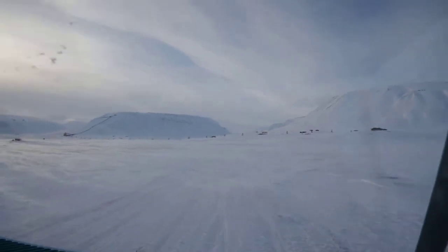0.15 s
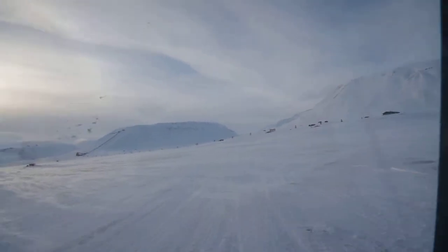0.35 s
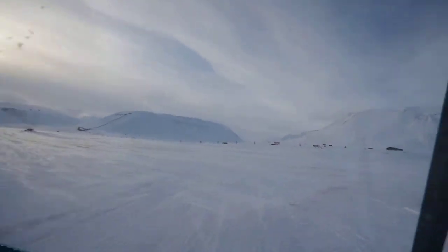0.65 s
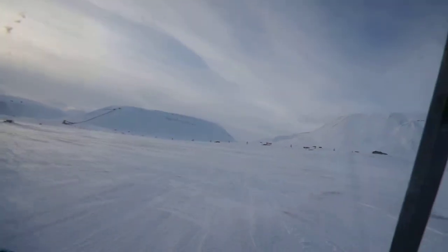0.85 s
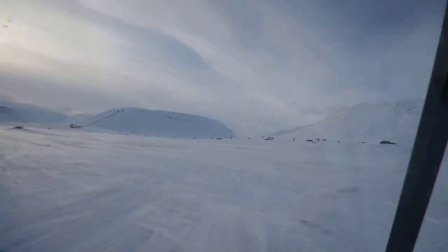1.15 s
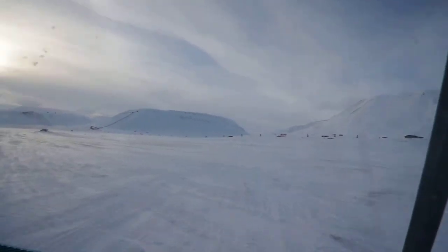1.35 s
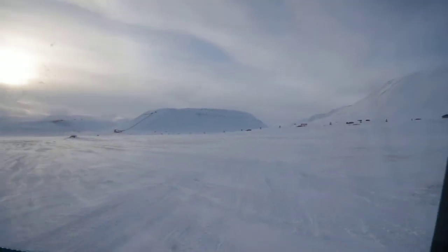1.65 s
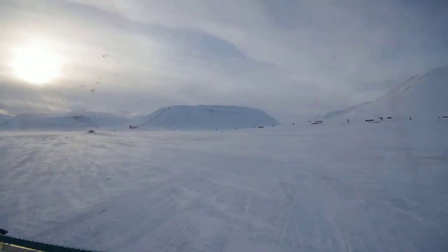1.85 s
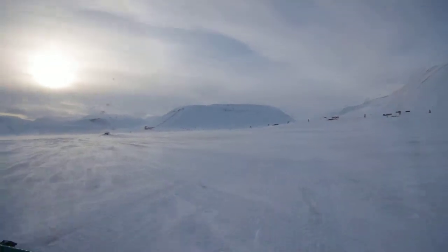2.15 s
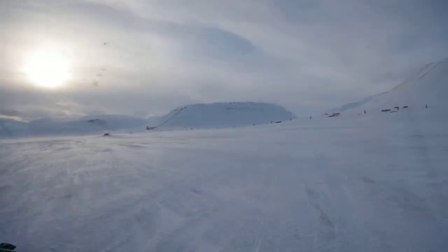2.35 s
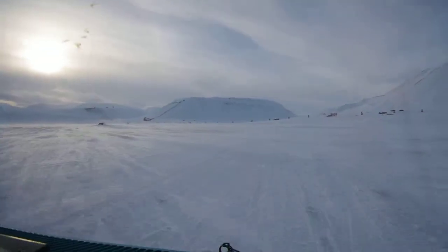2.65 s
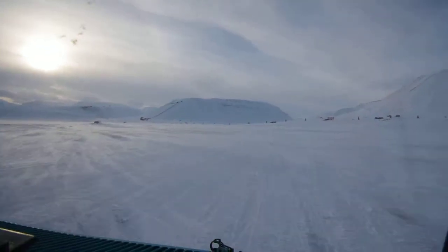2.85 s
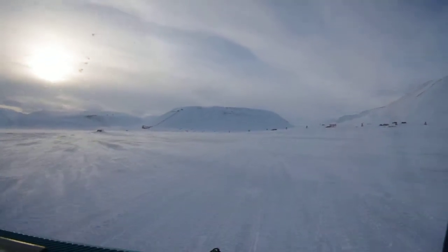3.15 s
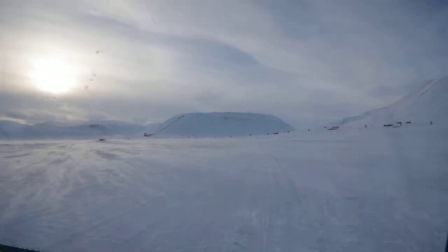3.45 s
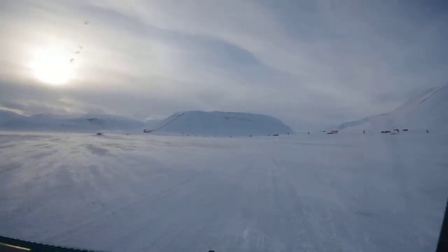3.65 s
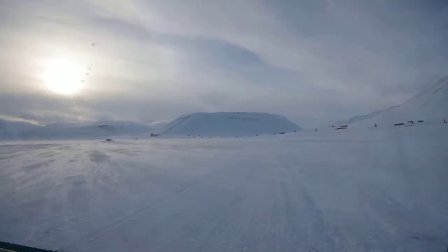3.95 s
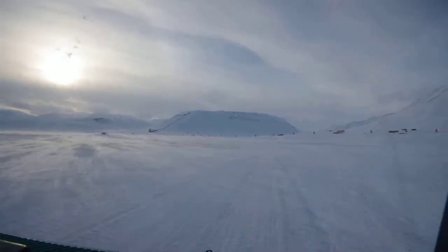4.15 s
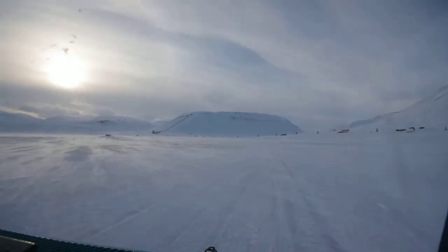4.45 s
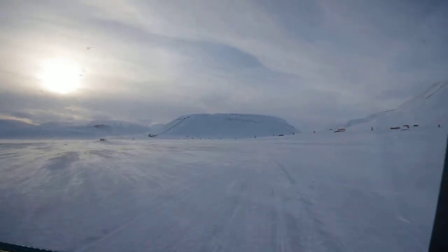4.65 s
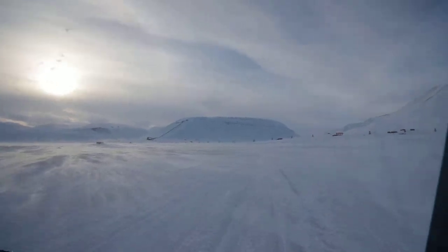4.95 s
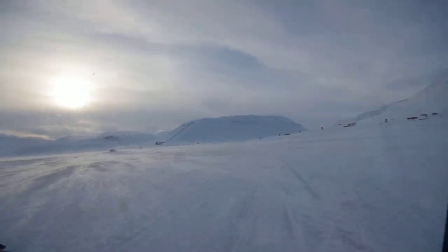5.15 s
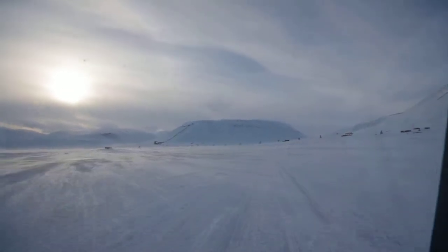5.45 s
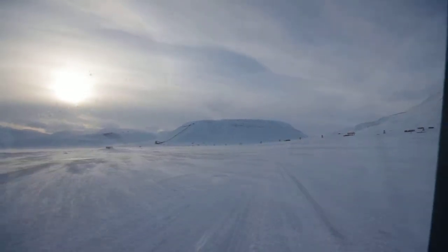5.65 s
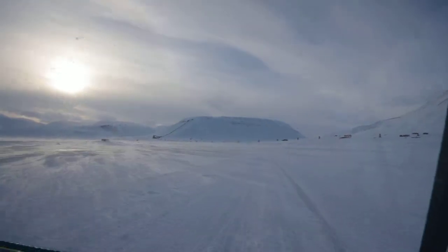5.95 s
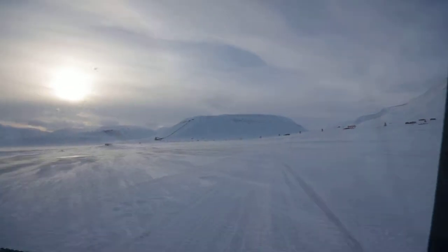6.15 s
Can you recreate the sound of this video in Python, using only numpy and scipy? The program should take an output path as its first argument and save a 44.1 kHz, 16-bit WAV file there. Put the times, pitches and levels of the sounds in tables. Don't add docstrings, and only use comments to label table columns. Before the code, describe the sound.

A booming engine drone dominates a cramped snow vehicle cab. Under it are track rumble, a muffled roar and a faint panel buzz. Hard bumps come early and again soon after, then a brief track slip at the middle. High metallic jingling flares, strongest in the later part, followed by more gear whine. The microphone overloads on deep jolts, giving irregular clicks and small level jumps all along.

```python
import sys
import numpy as np
from scipy import signal
from scipy.fft import rfft, irfft
from scipy.io import wavfile
from scipy.ndimage import uniform_filter1d

SR = 44100
rng = np.random.default_rng(int(sys.argv[2]) if len(sys.argv) > 2 else 0)


def transcribe(signal):
    frames = np.atleast_2d(signal).T
    limited = np.clip(frames, -1, 1)
    pcm = np.round(limited * 32767).astype(np.int16)
    wavfile.write(sys.argv[1], SR, pcm)


def gain_from_db(level_db):
    decades = np.asarray(level_db, float) / 20
    return 10 ** decades


N = 277406


def evened(x):
    return x / np.sqrt(np.mean(x ** 2) + 1e-20)


def curve(rows, column=1):
    columns = np.transpose(rows)
    return np.interp(np.arange(N) / SR, columns[0], columns[column])


def swells(rows, rest_db):
    centre_s, half_s, peak_db = np.transpose(rows)[:, :, None]
    t = np.arange(0, N + 64, 64) / SR
    each_db = peak_db - 12 * abs((t - centre_s) / half_s) ** 1.3
    return np.interp(np.arange(N) / SR, t, np.maximum(each_db.max(0), rest_db))


def wander(rate_hz):
    steps = rng.standard_normal(N // 64 + 2)
    smooth = signal.sosfiltfilt(signal.butter(2, rate_hz, fs=SR / 64, output="sos"), steps)
    return evened(np.interp(np.arange(N), np.arange(len(steps)) * 64, smooth))


def resonate(x, hz, width_hz):
    turn = np.exp(2j * np.pi * hz * np.arange(N) / SR)
    r = np.exp(-np.pi * width_hz / SR)
    return 2 * (turn * signal.lfilter([1 - r], [1, -r], x / turn)).real


def resonant_noise(hz, width_hz):
    once = resonate(rng.standard_normal(N), hz, width_hz)
    return evened(resonate(once, hz, width_hz))


# f/Hz, density/dB
ROAR_SPECTRUM = [(13, -46), (22, -30), (103, -5.5), (189, -5), (229, -4), (263, -8), (286, -4.5),
                 (328, -10), (366, -12.5), (569, -12.5), (792, -20), (5030, -44.5), (6270, -50.5),
                 (14700, -69), (16000, -37)]


def roar():
    frames, hz = N // 128 + 5, np.fft.rfftfreq(512, 1 / SR)
    real, imag, patches = rng.standard_normal((frames, 257, 3)).T
    patches = evened(uniform_filter1d(uniform_filter1d(patches, 10, 0), 12, 1))
    flicker = evened(uniform_filter1d(rng.standard_normal(frames), 3))
    flicker = flicker * np.clip(hz / 3000, 0, 1)[:, None]
    spectra = (real + 1j * imag) * gain_from_db(0.39 * patches + 2.2 * flicker)
    shaken = signal.istft(spectra, nperseg=512, noverlap=384)[1][:N]
    f, db = np.transpose(ROAR_SPECTRUM)
    log_hz = np.log(np.fft.rfftfreq(N, 1 / SR) + 1)
    colour = gain_from_db(np.interp(log_hz, np.log(f + 1), db))
    return gain_from_db(-36.5) * evened(irfft(rfft(shaken) * colour, N))


# f/Hz, width/Hz, level/dB
PANEL = (568, 24, -52)


def panel_buzz():
    hz, width_hz, db = PANEL
    return gain_from_db(db) * resonant_noise(hz, width_hz)


# t/s, level/dB, f/Hz
TICKS = [(0.1884, -35, 8900), (.969, -42.5, 8500), (1.2216, -37.5, 8350), (2.9233, -34.5, 8330),
         (3.8855, -32, 9250), (3.8888, -40, 7800), (3.975, -40, 7900), (4.3261, -40, 8950),
         (4.452, -44, 7800), (4.7486, -35, 8700), (4.845, -47, 8100), (4.7575, -58, 7600),
         (5.1935, -41, 8100), (6.1458, -35, 8200)]


def ticks():
    t, out = np.arange(300) / SR, np.zeros(N + 300)
    low = (t / .00022) * np.exp(1 - t / .00022) + .03 * np.exp(-t / .0015)
    high = .6 * (t / .0003) * np.exp(1 - t / .0003) + .02 * np.exp(-t / .0015)
    for s, db, hz in TICKS:
        tap = low * np.sin(2 * np.pi * hz * t) + high * np.sin(2.44 * np.pi * hz * t)
        at = round(s * SR)
        out[at:at + 300] += gain_from_db(db) * tap
    return out[:N]


# f/Hz, level/dB, ring length/s (60 dB down after 0.42 of it)
PARTS = [(6500, -11, .04), (8720, -9, .05), (10300, -8, .08), (11500, -10, .06), (12600, -6, .1),
         (13300, -7, .08), (14200, -6, .08), (14600, -8, .06), (15270, -1, .1), (15640, -4, .08)]
# centre t/s, half length/s, level/dB
SHAKES = [(.09, 0.11, -56), (.34, 0.046, -54), (.51, 0.051, -52), (.75, 0.29, -53.5), (1.62, 0.095, -49),
          (1.79, 0.098, -46.5), (1.89, 0.021, -48), (1.98, 0.046, -46), (2.015, 0.037, -49),
          (2.16, .06, -56), (2.45, 0.11, -56), (3.27, 0.24, -58), (3.46, .08, -47.5), (3.71, 0.07, -48),
          (4.13, .08, -52), (4.38, 0.068, -45.5), (4.62, 0.039, -37.5), (4.92, 0.0083, -63),
          (5.01, .025, -46), (5.46, 0.074, -50), (5.54, 0.052, -48.5), (6.2, 0.93, -56.5)]


def jingle():
    t, rings = np.arange(6000) / SR, np.zeros(N)
    knocks_per_s, threshold_db = 90, -64
    shake = gain_from_db(swells(SHAKES, rest_db=-61.5) + 3.4 * wander(51.0))
    clash = np.maximum(shake - gain_from_db(threshold_db), 0)
    for hz, db, ring_s in PARTS:
        strength = gain_from_db(3.5 * np.minimum(rng.exponential(1, N), 4))
        knocks = strength * (rng.random(N) < knocks_per_s / SR)
        ring = gain_from_db(db - 60 * t / (0.42 * ring_s)) * np.sin(2 * np.pi * hz * t)
        rings += signal.oaconvolve(evened(knocks) * clash, ring)[:N]
    rustle = signal.sosfilt(signal.butter(2, 7000, "high", fs=SR, output="sos"), rng.standard_normal(N))
    rustle += 0.51 * signal.sosfiltfilt(signal.butter(2, 13500, "high", fs=SR, output="sos"), rustle)
    return gain_from_db(-37.5) * rings + (gain_from_db(-7.5) * shake + gain_from_db(-71.5)) * rustle


# t/s, f/Hz
HUM = [(0.0, 272.9), (0.07, 278.8), (0.59, 276.4), (1.12, 279.7), (1.3, 277.4), (1.45, 281.1),
       (2.03, 280.7), (2.5, 286.2), (2.8, 286.3), (2.94, 290.2), (3.5, 288.0), (3.94, 284.6), (4.35, 285.0),
       (5.54, 279.1), (5.88, 279.4), (6.29, 277.2)]


def hum_turns():
    return np.cumsum(curve(HUM)) / SR


# f/Hz, width/Hz, level/dB
TRACK = [(106, 13, -3), (128, 25, -7), (75, 30, -9)]
# centre t/s, half length/s, loss/dB
SLIPS = [
    (.85, .4, 3),
    (1.18, 0.089, 14),
    (2.5, 0.55, 9),
    (2.98, .06, 20),
    (5.04, 0.056, 5),
    (5.19, 0.053, 3),
    (5.45, .07, 11),
]
# centre t/s, half length/s, level/dB
BUMPS = [(.12, 0.14, -34), (.39, 0.3, -37), (.65, .3, -45), (1.2, 0.081, -27), (1.75, 0.24, -32.5),
         (2.05, 0.46, -35.5), (2.26, .07, -27), (2.44, 0.099, -31), (2.95, 0.22, -46), (3.52, 0.23, -33.5),
         (3.75, 0.1, -35), (4.08, 0.21, -37), (4.43, 0.12, -32), (4.79, 0.058, -29), (5.03, .05, -35),
         (5.5, 0.99, -40), (5.88, 0.07, -38), (6.2, 0.27, -45)]


def tracks():
    fuzz = sum(gain_from_db(db) * resonant_noise(hz, width_hz) for hz, width_hz, db in TRACK)
    throb_db = -44.5 - swells(SLIPS, rest_db=0)
    sprocket_per_hum = .192
    throb = np.sqrt(2) * gain_from_db(throb_db) * np.sin(2 * np.pi * sprocket_per_hum * hum_turns())
    lumps_db = .65 * swells(BUMPS, rest_db=-44) - 14.5
    eased_db = -.8 * uniform_filter1d(gain_db(), size=SR // 8)
    return gain_from_db(eased_db) * (throb + gain_from_db(lumps_db) * evened(fuzz))


# t/s, pitch factor/1, level/dB
WHINE = [
    (0, .995, -62),
    (2, 1.0, -60),
    (3, 1.02, -59),
    (4.3, 1.01, -60),
    (4.8, 1.003, -56),
    (6.29, .993, -56),
]
GEAR_HZ = [866, 1122, 752]


def gear_whine():
    out = np.zeros(N)
    for hz, db in zip(GEAR_HZ, (1, -1, -2)):
        phase = 2 * np.pi * np.cumsum(hz * curve(WHINE)) / SR + .3 * wander(9.0)
        out += gain_from_db(curve(WHINE, column=2) + db + 1.76 * wander(17.0)) * np.sin(phase)
    return out


# multiple of firing rate/1, level/dB
ORDER_DB = [(1, -49.5), (2, -41), (3, -30.5), (6, -54.5), (8, -74)]


def engine():
    firings = hum_turns() / 3
    out = np.zeros(N)
    for k, db in ORDER_DB:
        phase = 2 * np.pi * k * firings + 0.004 * k * wander(21.0)
        out += np.sqrt(2) * gain_from_db(db + 1.2 * wander(6.7)) * np.sin(phase)
    return out


def scene():
    return (roar() + panel_buzz() + ticks() + jingle() + tracks() + gear_whine() + engine())[None]


def on_hum(rows, lead):
    rows, turns, t = np.array(rows, float), hum_turns(), np.arange(N) / SR
    place = .5 * (rows[:, 1] < 0) - lead
    cycle = np.round(np.interp(rows[:, 0], t, turns) - place)
    return np.c_[np.interp(cycle + place, turns, t), rows[:, 1:]]


def stairs(times_s, signs):
    at, out = np.asarray(times_s) * SR, np.zeros(N + 2)
    np.add.at(out, at.astype(int), signs * (1 - at % 1))
    np.add.at(out, at.astype(int) + 1, signs * (at % 1))
    return out[:N]


CLIMB_S, CLIMB_SHARE = .0065, .8
NIP_LUCK = rng.random((800, 3))
# start t/s, length/s
LULLS = [(.28, .095), (.58, .085), (.88, .08), (1.14, .05), (1.38, .07), (1.7, .085), (2.0, .07),
         (2.11, .065), (2.33, .1), (2.51, .135), (2.875, .13), (3.06, .09), (3.19, .06), (3.57, .085),
         (3.715, .05), (3.99, .04), (4.21, .075), (4.705, .05), (4.87, .045), (5.03, .04), (5.11, .09),
         (5.76, .13), (6.01, .05)]


def nips():
    soonest_s, mean_further_s, stairs_allowed, most_cut = .004, .007, 5, 3
    gap, weak, sign = NIP_LUCK.T
    s = np.cumsum(soonest_s - mean_further_s * np.log(gap))
    start, length = np.transpose(LULLS)[:, :, None]
    in_lull = ((s > start) & (s < start + length)).any(0)
    live = ~in_lull & (s < N / SR - .01)
    small = [(t, 0, stairs_allowed * w, 2 * g - 1) for t, w, g in zip(s[live], weak[live], sign[live])]
    deep = [(row[0], abs(row[1]) + sum(row[2:]), 0, 0) for row in CUTS + SLAMS]
    rows, height, last_s = [], 0, 0
    for t, cut, allowed, side in sorted(small + deep):
        now = height + CLIMB_SHARE * ((t - last_s) // CLIMB_S)
        if not cut:
            excess = now - allowed
            cut = min(np.ceil(excess), np.ceil(most_cut * side ** 2) + excess // stairs_allowed)
        if cut > 0:
            height, last_s = now - cut, t
            if side:
                rows.append((t, np.sign(side) * cut))
    return np.array(rows)


# t/s, stairs/1 signed as the click
CUTS = [(0.0657, 5), (0.2054, -4), (0.2757, 4), (0.3963, -6), (0.8237, 5), (0.8606, 4), (1.072, 4),
        (1.2745, -5), (1.6956, 6), (1.7903, 4), (1.9509, -4), (2.3644, 4), (2.4514, 5), (2.694, -4),
        (3.0089, 5), (3.0409, -6), (3.2843, 5), (3.5285, -5), (3.6805, 4), (3.7095, -5), (4.0456, -5),
        (4.1329, -7), (4.5678, 4), (4.7007, 4), (4.771, 6), (4.9394, 5), (5.0731, 5), (5.5672, -4),
        (5.6788, -5), (5.7232, 5)]
# t/s, quick signed stairs/1, slower stairs after/1
SLAMS = [(0.3787, -5, 2), (0.5754, 5, 3), (0.6706, 6, 0), (0.7308, 5, 0), (1.1079, 4, 1), (1.1929, 5, 2),
         (1.4511, 9, 2), (1.5451, 5, 0), (1.639, 2, 4), (1.9873, -5, 0), (2.071, 4, 1), (2.1766, 6, 2),
         (2.2697, 5, 0), (2.4321, -7, 1), (2.6466, 7, 4), (2.87, 6, 1), (3.445, 4, 1), (3.4826, 5, 0),
         (3.5663, -5, 3), (3.8603, -5, 0), (4.2076, -4, 1), (4.3367, -4, 3), (4.481, -5, 0),
         (4.7592, -2, 3), (5.023, -5, 1), (5.204, -5, 1), (5.2874, 6, 0), (5.4017, 4, 1), (5.8945, 4, 4),
         (6.1041, 5, 0)]


def cut_trains():
    quick_s, stair_s = .0001, .0004
    cuts, slams = on_hum(np.r_[CUTS, nips()], lead=0), on_hum(SLAMS, lead=.11)
    slow, quick = [], []
    for s, n in cuts:
        slow += [(s + k * stair_s, np.sign(n)) for k in range(abs(int(n)))]
    for s, n, after in slams:
        quick += [(s + k * quick_s, np.sign(n)) for k in range(abs(int(n)))]
        end_s = s + (abs(n) - 1) * quick_s
        slow += [(end_s + (k + 1) * stair_s, np.sign(n)) for k in range(int(after))]
    return stairs(*np.transpose(slow)), stairs(*np.transpose(quick))


def climb_train(cuts):
    n = np.arange(N)
    since = (n - np.maximum.accumulate(n * (cuts > 0))) / (CLIMB_S * SR)
    return np.maximum(np.diff(np.floor(since), prepend=0), 0)


# t/s, level/dB
DRIFT = [(0.0, -28), (0.36, -24.5), (0.45, -30.5), (0.62, -25.5), (.75, -24.5), (0.9, -29.5), (1.15, -23),
         (1.5, -29), (1.9, -25.5), (2.4, -24), (2.65, -24.5), (3.1, -22), (3.4, -28), (4.4, -27),
         (4.62, -25), (4.82, -27), (5.2, -25), (6.29, -27.5)]


def gain_db():
    stair_db = .64
    slow, quick = (abs(train) for train in cut_trains())
    level = np.cumsum(CLIMB_SHARE * climb_train(slow + quick) - slow - 0.74 * quick)
    level = level - uniform_filter1d(level, size=SR // 2, mode="nearest")
    return stair_db * level + curve(DRIFT) + 25


def settle(clicks):
    stages = [signal.butter(1, hz, "high", fs=SR, output="sos") for hz in (320, 50)]
    return signal.sosfilt(np.concatenate(stages), np.cumsum(clicks))


def gain_clicks():
    slow, quick = cut_trains()
    pressure = np.clip(0.22 * wander(35.0), -1, 1)
    climbs = climb_train(abs(slow) + abs(quick)) * pressure
    thuds = signal.sosfilt(signal.butter(2, 1500, fs=SR, output="sos"), quick)
    clicks = gain_from_db(-31.5) * settle(slow + .9 * quick + .85 * thuds + climbs)
    return signal.sosfilt(signal.butter(1, 11000, fs=SR, output="sos"), clicks)


def top_cut(x):
    return signal.sosfilt(signal.butter(12, 16690, fs=SR, output="sos"), x)


def record(dry):
    taken = dry * gain_from_db(gain_db()) + gain_clicks()
    low_pass = signal.firwin(801, 15850, window=("kaiser", 9), fs=SR)
    taken = signal.oaconvolve(taken, low_pass[None], "same")
    return top_cut(taken)


dry = scene()
out = record(dry)
transcribe(out)
```